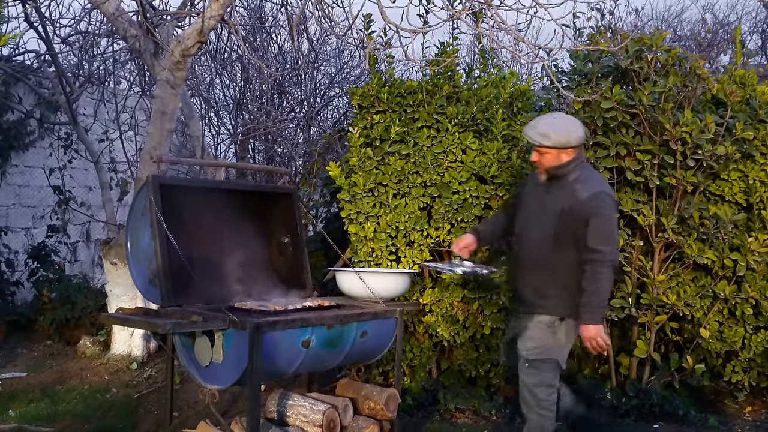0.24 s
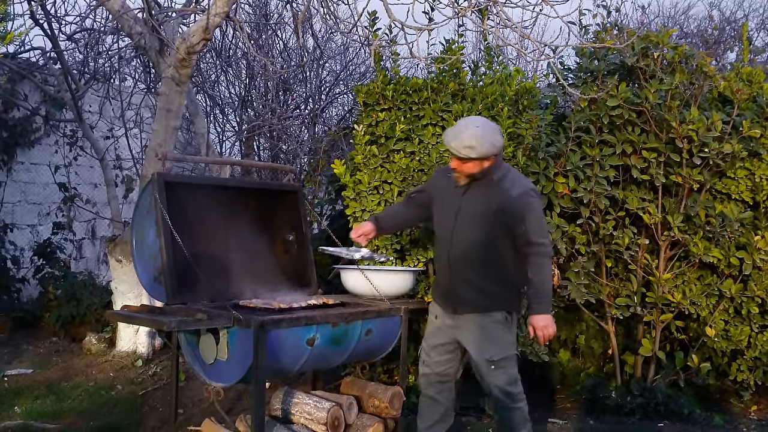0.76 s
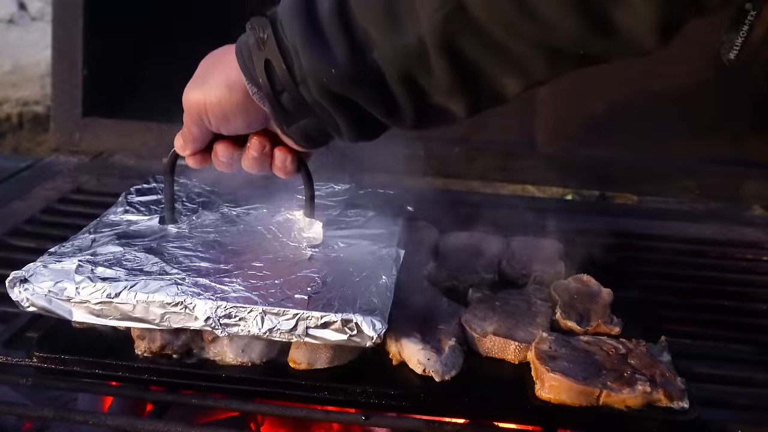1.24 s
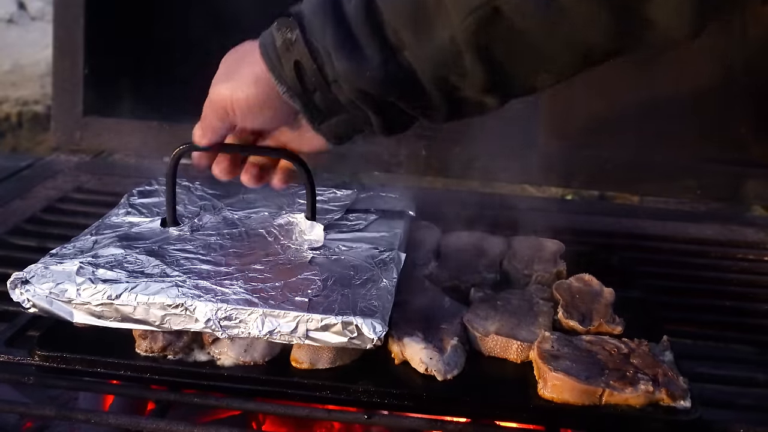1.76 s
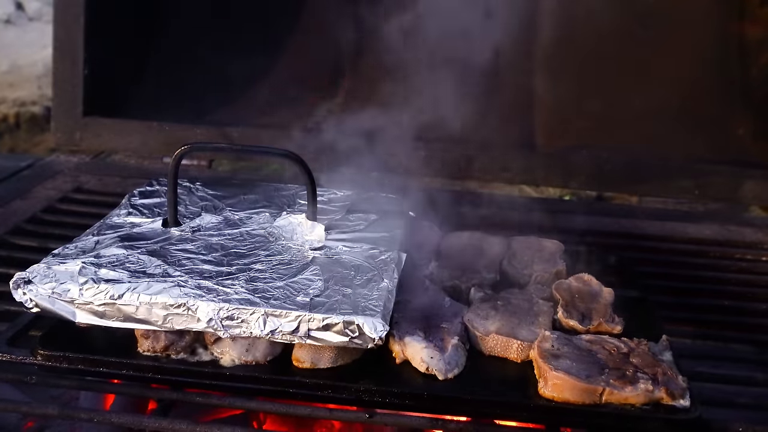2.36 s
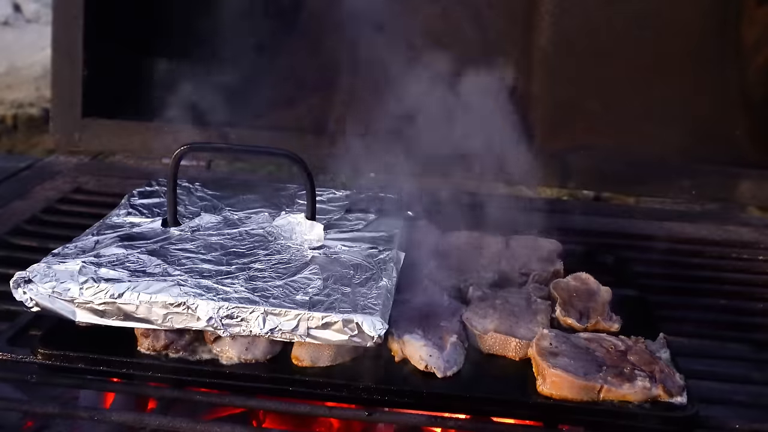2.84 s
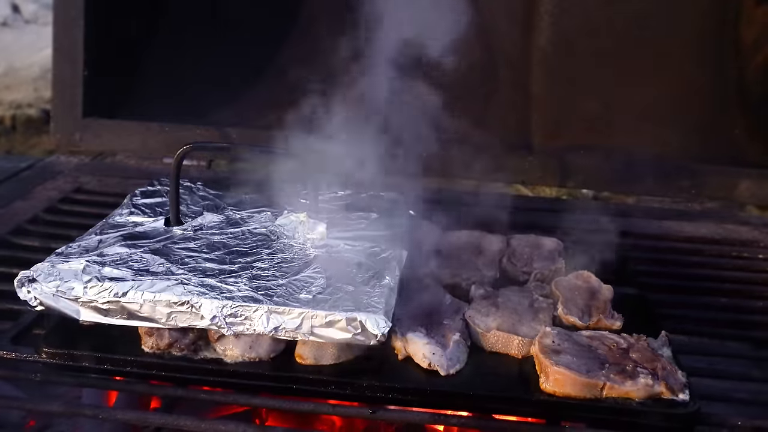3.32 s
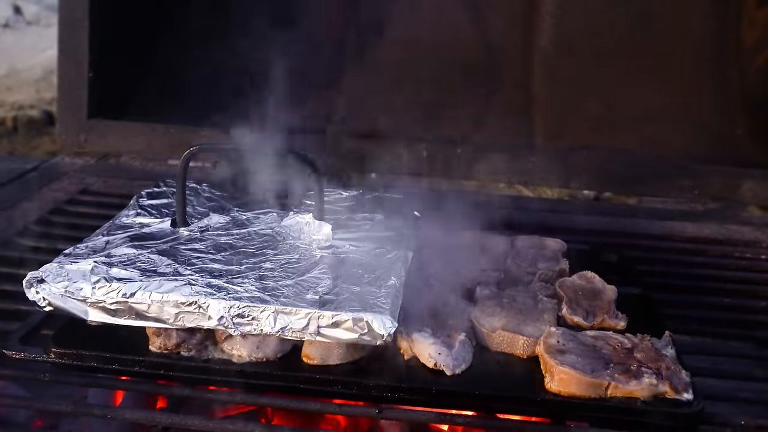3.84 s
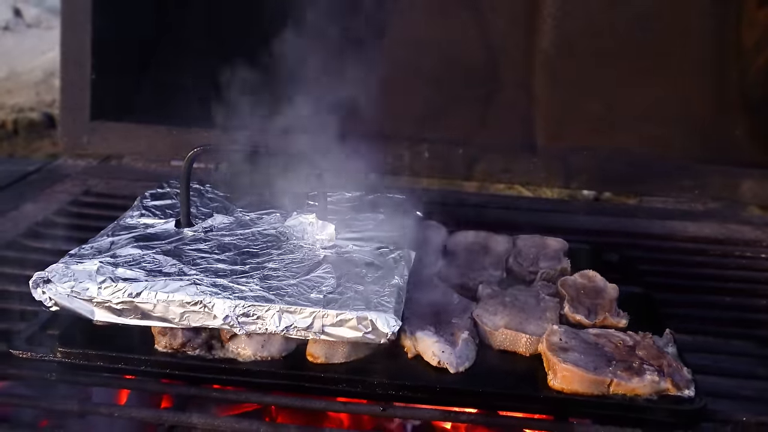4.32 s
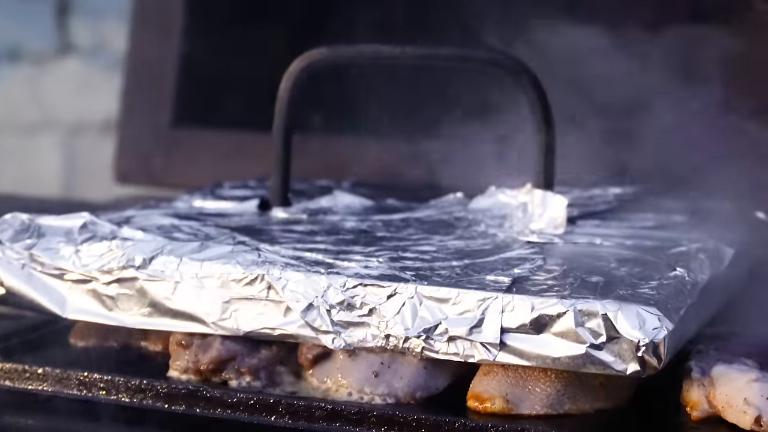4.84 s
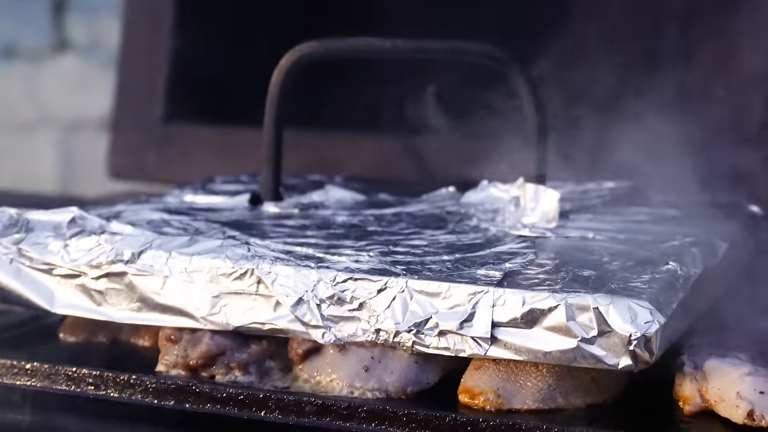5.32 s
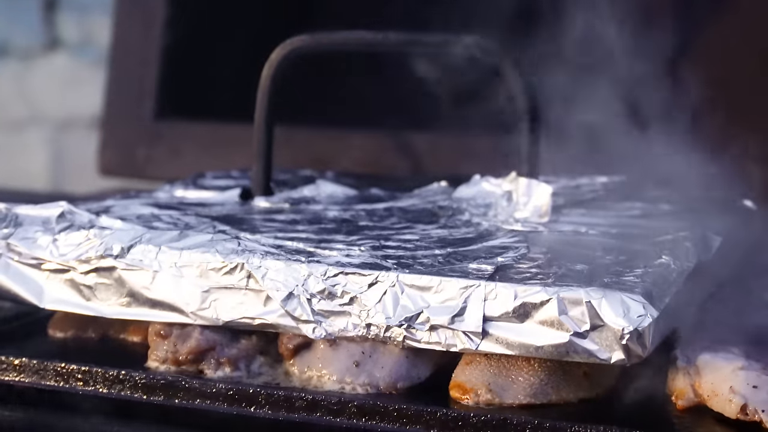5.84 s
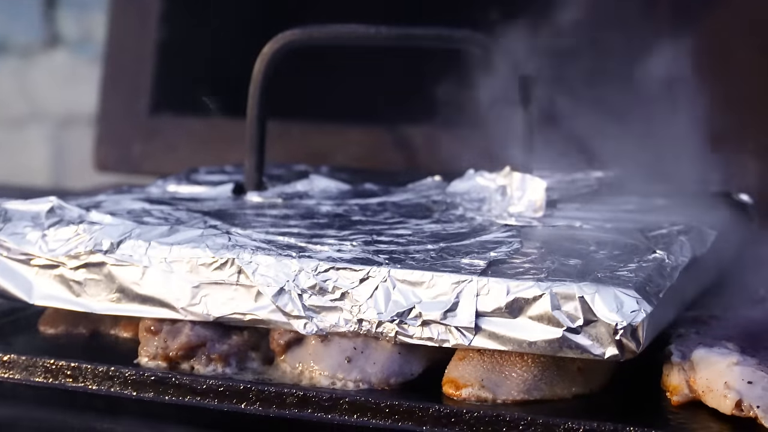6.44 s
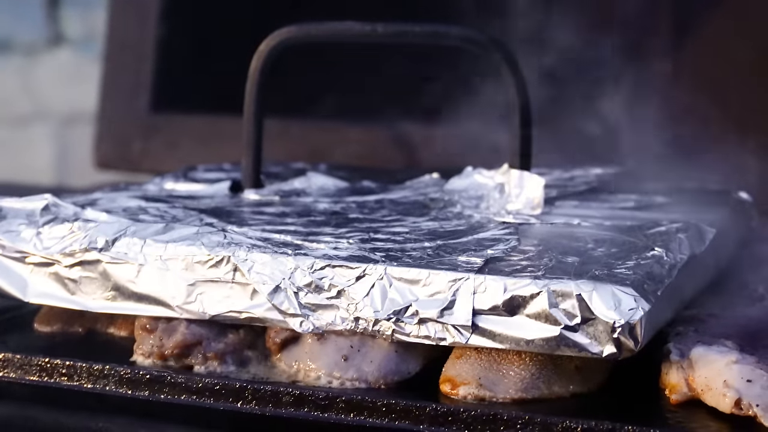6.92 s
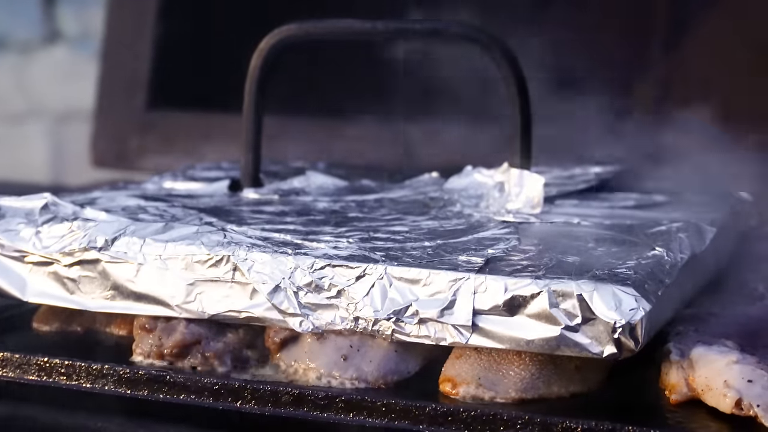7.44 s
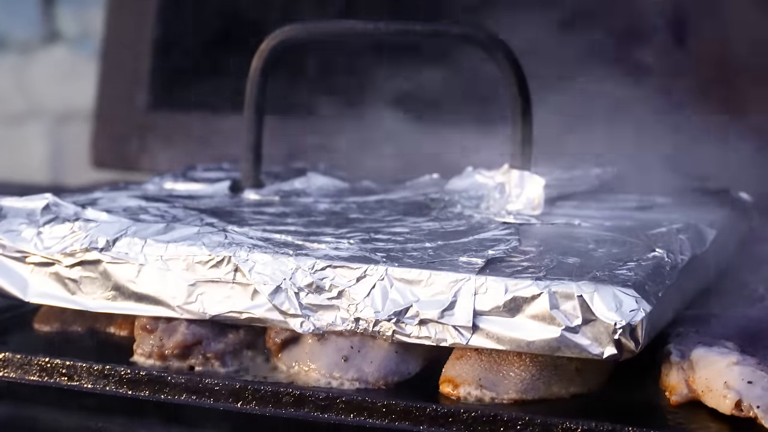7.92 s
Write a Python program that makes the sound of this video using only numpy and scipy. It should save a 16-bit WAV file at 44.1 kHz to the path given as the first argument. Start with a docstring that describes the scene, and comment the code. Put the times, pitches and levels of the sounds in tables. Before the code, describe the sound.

Meat sizzles faintly on an outdoor barrel grill a few steps away. Within about a second the sizzle swells and comes close to the microphone. As a press bears down on the slices, juice starts to boil beneath it. The dense hiss and crackle carry on, dotted with sharp pops of spitting fat and small sputters of steam, easing slightly. A faint low rumble rises at the very end.

```python
"""Slices of meat sizzle on a barrel grill over faint outdoor air, first from a few steps away, then close.
From 1.2 s a foil-wrapped press bears down and juice boils in the gap under it. Countless tiny bubbles
burst in the fat, drops spit and pop, echoed by the open lid, and steam sputters from under the slices.
The one microphone's limiter ducks after the loudest pops. A faint rumble swells at the end."""
import sys
import numpy as np
from scipy import signal
from scipy.fft import rfft, irfft, next_fast_len
from scipy.io import wavfile
from scipy.ndimage import map_coordinates

SR = 44100
rng = np.random.default_rng(int(sys.argv[2]) if len(sys.argv) > 2 else 0)


def unload_audio(sound):
    """Save the sound as a 16-bit wav file, at the path given as the first command line argument."""
    columns = np.transpose(np.atleast_2d(sound))
    # keep every value between -1 and 1, then stretch to whole-number steps
    steps = np.round(np.clip(columns, -1, 1) * 32767)
    wavfile.write(sys.argv[1], SR, steps.astype(np.int16))


N = 360297
PRESS_S = 1.2  # the press bears down


def amp(db):
    """Decibels to gain."""
    return 10 ** (np.asarray(db) / 20)


def unit(x):
    """x at rms 1."""
    return x / np.sqrt(np.mean(x ** 2) + 1e-20)


def at_energy(x, db, length_s):
    """x with the energy of a sound held at db for length_s."""
    return x * amp(db) * np.sqrt(length_s * SR / np.sum(x ** 2))


def since(start_s):
    """Seconds since start_s, per sample; negative before it."""
    return np.arange(N) / SR - start_s


def curve(points):
    """(seconds, value) points joined by lines, per sample."""
    return np.interp(since(0), *np.transpose(points))


def wobble(rate_hz):
    """Smooth random curve, rate_hz knots a second."""
    knots = rng.standard_normal(int(N * rate_hz / SR) + 4)
    return map_coordinates(knots, [np.arange(N) * rate_hz / SR])


def smooth(x, lag_s):
    """One-pole lag."""
    pole = np.exp(-1 / (lag_s * SR))
    return signal.lfilter([1 - pole], [1, -pole], x)


def shape(points):
    """Gain against frequency from (Hz, dB) points on a log axis."""
    points_hz, db = np.transpose(points)
    return lambda hz: amp(np.interp(np.log(hz + 1), np.log(points_hz), db))


def hump(hz, centre_hz, octaves):
    """Broad peak with gentle skirts."""
    return 1 / (1 + (np.log2((hz + 1) / centre_hz) / octaves) ** 2)


def colour(x, gain, size=4096):
    """x through the minimum-phase filter of magnitude gain(hz)."""
    magnitude = np.maximum(gain(np.fft.rfftfreq(size, 1 / SR)), 1e-6)
    cepstrum = irfft(np.log(magnitude))
    cepstrum[1:size // 2] *= 2
    cepstrum[size // 2 + 1:] = 0
    return signal.oaconvolve(x, irfft(np.exp(rfft(cepstrum))))[:len(x)]


def noise(gain):
    """Coloured noise of rms 1."""
    return unit(colour(rng.standard_normal(N), gain))


def bursts(per_s, spread_db, cap_sigma):
    """Impulses at random moments, with capped log-normal sizes."""
    sizes = amp(spread_db * np.minimum(rng.standard_normal(N), cap_sigma)) * rng.choice([-1, 1], N)
    return sizes * (rng.random(N) < per_s / SR)


def lid(x, echo_db, delay_s=0.0035):
    """The open lid throws back one echo."""
    return x + amp(echo_db) * np.pad(x, (round(delay_s * SR), 0))[:len(x)]


def frying_db():
    """Level of the frying fat at the microphone."""
    # Each row: time in seconds, level of the frying in dB.
    vigour = [(1.3, -24), (1.9, -24.5), (3.1, -26), (3.75, -24.5), (4.35, -26.5), (4.7, -26), (5.4, -28),
              (5.75, -26), (6.6, -27), (7.2, -27.5), (7.7, -27.5), (8.1, -28.5)]
    # Each row: time in seconds, gain in dB on coming up to the grill.
    approach = [(0.5, -22.5), (0.65, -13), (0.8, -8), (1.1, -2.1), (1.3, 0.8)]
    return curve(vigour) + curve(approach)


def outdoors(rumble_full_s=8.13, rise_db_per_s=61):
    """Faint low air, and a rumble that rises at the end."""
    # Each row of both spectra: frequency in Hz, density in dB.
    air_spectrum = [(15, -4), (26, 5), (38, -21), (70, -7), (140, -0.5), (260, -17), (600, -3.5),
                    (2000, -18.5)]
    rumble_spectrum = [(60, -30), (140, -20), (200, -4), (280, -6), (500, -3), (800, -10), (1400, -16),
                       (3000, -40)]
    air = noise(shape(air_spectrum)) * amp(-62 + 0.63 * wobble(4.7))
    rumble_db = -42.5 + rise_db_per_s * np.minimum(since(rumble_full_s), 0)
    return air + noise(shape(rumble_spectrum)) * amp(rumble_db + 1.1 * wobble(20))


def distant_sizzle(fade_db_per_s=70):
    """From a few steps away the crackles blur and lose their top; this fades on coming close."""
    # Each row: frequency in Hz, density in dB.
    spectrum = [(100, -20), (300, -11), (540, -8.5), (800, -7.5), (1200, -12.5), (2400, -6.5), (3200, -6.5),
                (4200, -7.5), (6500, 0), (7700, -4), (9300, -13), (11000, -11.5), (15500, -15)]
    grains = 0.5 * unit(bursts(per_s=700, spread_db=9, cap_sigma=2.4)) + rng.standard_normal(N)
    level_db = -42.5 - fade_db_per_s * np.maximum(since(PRESS_S), 0)
    return unit(colour(grains, shape(spectrum))) * amp(level_db + 0.7 * wobble(28))


def sputters(size=16384):
    """Steam forces its way out through the juice under a slice in short runs of low bubbles."""
    # Each row: start in seconds, level in dB, pitch in Hz, length in seconds.
    runs = [(3.04, -52, 168, 0.056), (3.537, -42, 780, 0.027), (3.562, -44, 580, .025),
            (3.633, -40.5, 280, 0.02), (3.672, -50, 270, 0.1), (4.176, -38, 730, 0.016),
            (4.624, -45.5, 420, 0.063), (6.623, -43, 570, 0.027), (6.976, -44.5, 265, 0.033),
            (7, -48, 420, 0.071), (7.362, -44, 232, 0.025)]
    track, t = np.zeros(N + size), np.arange(size) / SR
    for start_s, db, pitch_hz, length_s in runs:
        flutter = rng.standard_normal(size) * amp(1.1 * wobble(91)[:size])
        envelope = (1 - np.exp(-t / 0.0012)) * np.exp(-(t / length_s) ** 2)
        run = colour(flutter * envelope, lambda hz: hump(hz, pitch_hz, 0.36))
        track[round(start_s * SR):][:size] += at_energy(run, db, length_s)
    return track[:N]


def juice(rise_db_per_s=60, drying_db_per_s=1.1):
    """Juice boils in uneven spurts, rings the gap between plate and press, and slowly dries up."""
    # Each row: resonance of the gap in Hz, width in Hz, relative peak in dB.
    gap_modes = [(420, 92, -6.5), (565, 247, 0.5), (775, 71, 3), (1153, 250, -0.5), (1666, 540, 4),
                 (2367, 710, 9.5), (2750, 340, 4.5)]

    def gap_gain(hz):
        power = 0
        for mode_hz, width_hz, db in gap_modes:
            resonance = hz * width_hz / (mode_hz ** 2 - hz ** 2 + 1j * hz * width_hz)
            power += amp(db) ** 2 * np.abs(resonance) ** 4
        return np.sqrt(power)

    t = since(PRESS_S)
    level_db = frying_db() - 9 + np.minimum(rise_db_per_s * t, -drying_db_per_s * t)
    boil = unit(bursts(per_s=1100, spread_db=8, cap_sigma=2.24)) + 0.76 * rng.standard_normal(N)
    spurts = boil * amp(2.15 * wobble(24))
    return unit(colour(spurts, gap_gain)) * amp(level_db)


def small_drops(per_s=2.5, count=80):
    """Rows for pops(): lesser drops once the press is down, one at random in each time slot."""
    crack, thud, pitch, moment = rng.standard_normal((count, 4)).T
    start_s = PRESS_S + (np.arange(count) + moment % 1) / per_s
    crack_db, thud_db = -25 + 0.5 * crack, -40.5 + 0.5 * thud
    pitch_hz = 5300 * 2 ** (0.2 * pitch)
    t60_s = np.full(count, 0.007)
    rows = np.column_stack([start_s, crack_db, pitch_hz, t60_s, thud_db])
    return rows[start_s < N / SR].tolist()


def pops(size=4096, body_s=0.0025, gap_hz=2220, thud_lift_db=1.5):
    """A drop bursts with a short pitched crack that rings the gap; the freed steam gives a dull thud."""
    # Each row: start in seconds, crack level in dB, pitch in Hz, 60 dB decay time of the burst in
    # seconds, thud level in dB before the lift.
    loud_drops = [(0.707, -38, 4500, .008, -36), (0.899, -30, 4600, 0.0054, -37.5),
                  (1.279, -22, 2700, 0.0083, -31), (1.310, -21, 2980, .008, -31),
                  (1.444, -18, 3500, .003, -37), (1.668, -33, 4400, .006, -32.5),
                  (1.947, -23, 3400, .006, -33), (2.073, -26.5, 6400, .006, -28),
                  (2.638, -33, 4500, .006, -31.5), (2.798, -20, 2500, .009, -26),
                  (2.8203, -6, 2800, 0.0066, -18), (2.824, -10, 2150, .0064, -35),
                  (2.930, -18, 3060, .004, -26), (2.934, -19, 3400, 0.0071, -29),
                  (2.989, -30, 4600, .006, -26.5), (3.112, -22, 4600, .003, -44),
                  (3.262, -25, 4200, .006, -31), (3.432, -31, 5100, .006, -30.5),
                  (3.640, -27, 4000, .006, -30), (3.671, -23, 4000, .006, -28.5),
                  (3.841, -17.5, 5070, .004, -49), (4.211, -16.5, 4420, .003, -51),
                  (4.260, -16.5, 5450, 0.0027, -34), (4.4039, -14.5, 5460, .0015, -49),
                  (4.585, -19, 5500, .006, -50), (4.648, -20, 2670, 0.0075, -32),
                  (4.836, -15.5, 2200, 0.0091, -52), (5.150, -17.5, 4200, .006, -27),
                  (5.525, -20.5, 5260, .0025, -34), (5.9322, -17, 4600, 0.007, -38),
                  (5.947, -18, 5960, 0.0046, -48), (5.981, -20.5, 3170, 0.0057, -23.5),
                  (6.2128, -25, 4100, .006, -33.5), (6.229, -14, 3230, .012, -39),
                  (6.366, -19.5, 3850, 0.0086, -50), (6.500, -21, 5200, .006, -35),
                  (6.632, -17.5, 5300, .004, -41), (6.831, -22, 2800, .007, -31),
                  (6.937, -20, 5200, .006, -37), (6.979, -26, 5300, .005, -34),
                  (7.0635, -20, 4500, .0055, -53), (7.2136, -16.5, 2770, .004, -45),
                  (7.214, -16.5, 1450, .007, -48), (7.367, -15.5, 4970, 0.0084, -29),
                  (7.3743, -17.5, 2400, 0.0073, -35), (7.503, -20, 3180, 0.0035, -47),
                  (7.885, -20.5, 4200, .009, -31), (7.901, -13, 5200, 0.0064, -36),
                  (7.904, -15.5, 3000, .005, -45), (8.1235, -15.5, 4900, 0.007, -24.5)]
    # Each row of both: frequency in Hz, gain in dB.
    thud_spectrum = [(25, -37), (90, -9), (170, -6.5), (270, 6), (380, 2.5), (560, 8), (1100, 8.5),
                     (1700, 9.5), (3500, -55)]
    mic_rolloff = [(6800, 2), (8000, -0.5), (9200, -2), (13500, -8), (15800, -24)]
    track, t = np.zeros(N + size), np.arange(size) / SR
    barrel_tail = amp(-21 - 60 * t / 0.04)
    gap_and_mic = lambda hz: (1 + hump(hz, gap_hz, 0.28)) * shape(mic_rolloff)(hz)
    for start_s, crack_db, pitch_hz, t60_s, thud_db in loud_drops + small_drops():
        burst = rng.standard_normal(size) * (amp(-60 * t / t60_s) + barrel_tail)
        spray = colour(burst, lambda hz: hump(hz, pitch_hz, 0.8) * gap_and_mic(hz))
        bubble_ring = np.sin(2 * np.pi * pitch_hz * t) * amp(-60 * t / (1.36 * t60_s))
        crack = at_energy(unit(spray) + 0.33 * unit(bubble_ring), crack_db, body_s)
        steam = (t == 0) + 0.19 * rng.standard_normal(size) * amp(-60 * t / 0.034)
        thud = at_energy(colour(steam, shape(thud_spectrum)), thud_db + thud_lift_db, body_s)
        track[round(start_s * SR):][:size] += crack + thud
    return lid(track[:N], echo_db=-15)


def fat(crackle_growth_per_s=0.053):
    """Tiny bubbles merge into a hiss, larger ones crackle, drops spit; the air in the barrel hums along."""
    # Each row of both spectra: frequency in Hz, density in dB.
    fat_spectrum = [(100, -37.5), (350, -26), (1000, -14), (2000, -7), (2750, -3), (3250, -5.5), (4000, -3),
                    (5500, -2), (6800, -1), (7800, -3.5), (9000, -9), (11000, -10.5), (13500, -16.5),
                    (15500, -13)]
    barrel_spectrum = [(110, -21), (205, -15.5), (245, -0.5), (262, 2), (290, -6), (340, -10.5), (700, -34)]
    fat_gain = shape(fat_spectrum)
    pitches_hz = np.geomspace(2200, 12000, num=5)  # one per bubble size
    all_bands = lambda hz: np.sqrt(sum(hump(hz, pitch_hz, 1) ** 2 for pitch_hz in pitches_hz))
    crackle = 0
    for pitch_hz in pitches_hz:
        # The smallest bubbles are the most numerous.
        bubbles = bursts(per_s=620 * np.sqrt(pitch_hz / 5000), spread_db=8, cap_sigma=2.2)
        flurries = bubbles * amp(1.6 * wobble(35))
        crackle += colour(flurries, lambda hz: fat_gain(hz) * hump(hz, pitch_hz, 0.75) / all_bands(hz))
    hiss = noise(fat_gain) * amp(0.91 * wobble(70))
    drops = bursts(per_s=26, spread_db=1.5, cap_sigma=1.2)
    spits = unit(colour(drops, lambda hz: fat_gain(hz) * hump(hz, 3800, 0.96)))
    distinct = unit(lid(crackle, echo_db=-21)) + amp(-11) * spits
    # As the juice dries, power shifts from hiss to distinct bursts.
    drying_s = np.maximum(since(PRESS_S), 0)
    share = np.clip(0.2 + crackle_growth_per_s * drying_s, 0, 1)
    sizzle = np.sqrt(share) * distinct + np.sqrt(1 - share) * hiss
    hum = noise(shape(barrel_spectrum)) * amp(-33 + 0.8 * wobble(16))
    return (sizzle + hum) * amp(frying_db() + 0.31 * wobble(14))


def scene():
    """All sources at one microphone, on two equal channels."""
    mono = fat() + juice() + sputters() + pops() + distant_sizzle() + outdoors()
    return np.array([mono, mono])


def limiter(x, threshold_db, attack_s, release_s):
    """Gain drops just after a loud peak and creeps back."""
    power = smooth(x[0] ** 2, lag_s=0.00063)
    over_db = np.maximum(10 * np.log10(power + 1e-12) - threshold_db, 1e-6)
    decay = since(0) / release_s
    held_db = np.exp(np.maximum.accumulate(np.log(over_db) + decay) - decay)  # decaying peak hold
    return x * amp(-smooth(held_db, attack_s))


def record(dry, top_hz=15800):
    """Limiter, soft clipping of the peaks that slip past it, and a band limit."""
    limited = limiter(dry, threshold_db=-14.5, attack_s=0.0055, release_s=0.036)
    # The half-waves clip at unequal heights, so the loudest pops leave a low bump.
    ceiling = np.where(limited > 0, 0.445, 0.46)
    clipped = limited / (1 + np.abs(limited / ceiling) ** 8) ** (1 / 8)
    size = next_fast_len(N + SR // 2)
    passband = np.fft.rfftfreq(size, 1 / SR) < top_hz
    return irfft(rfft(clipped, size) * passband, size)[:, :N]


dry = scene()
out = record(dry)
unload_audio(out)
```